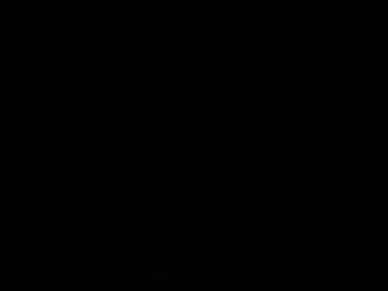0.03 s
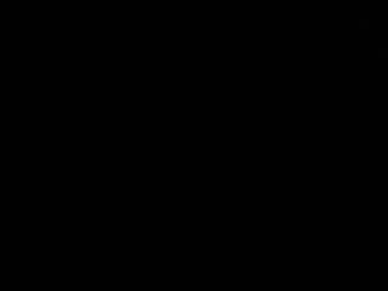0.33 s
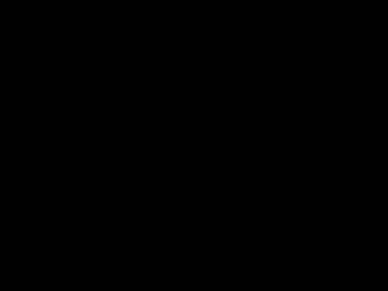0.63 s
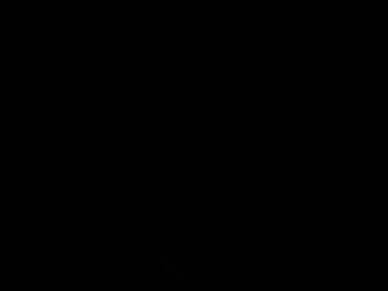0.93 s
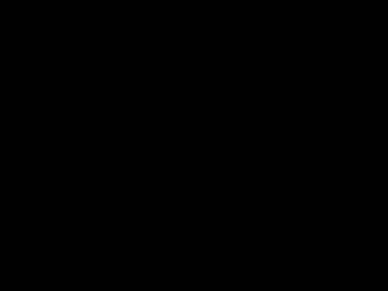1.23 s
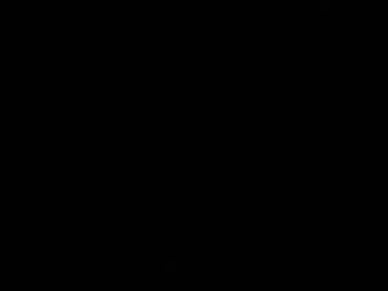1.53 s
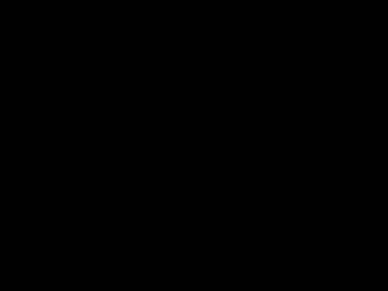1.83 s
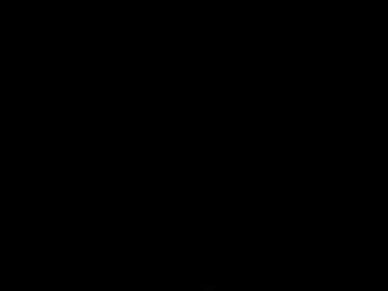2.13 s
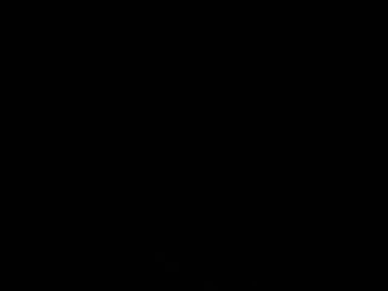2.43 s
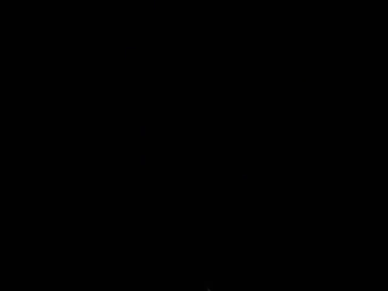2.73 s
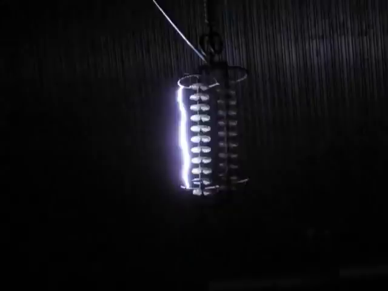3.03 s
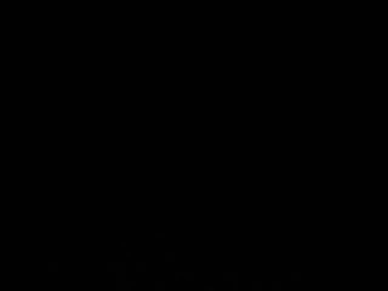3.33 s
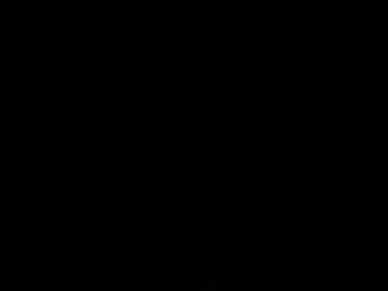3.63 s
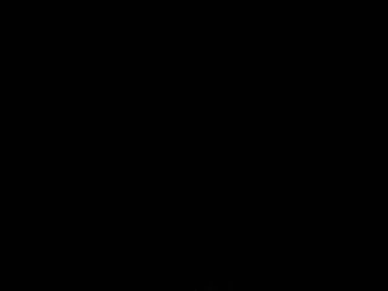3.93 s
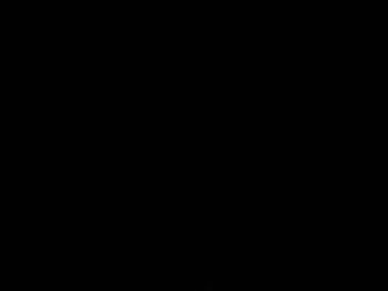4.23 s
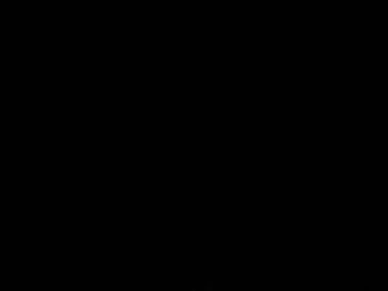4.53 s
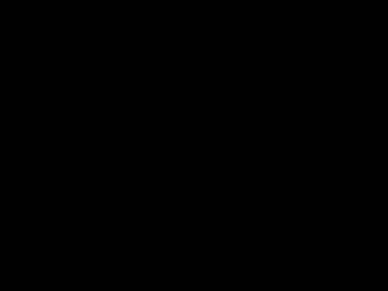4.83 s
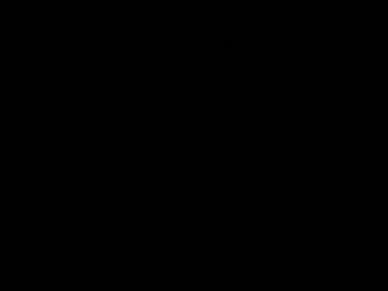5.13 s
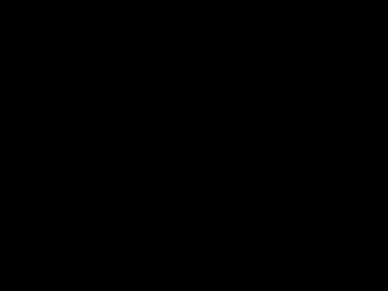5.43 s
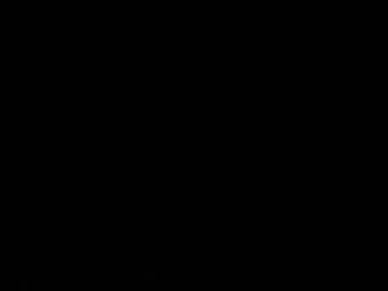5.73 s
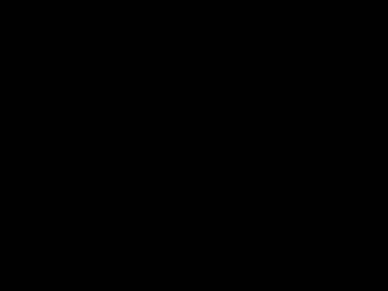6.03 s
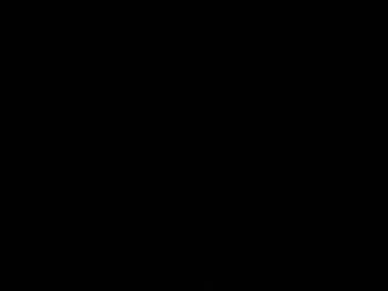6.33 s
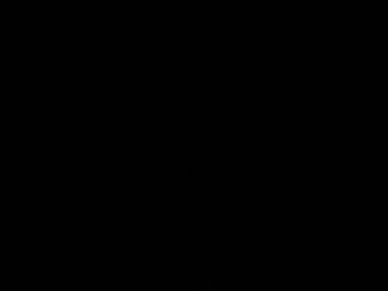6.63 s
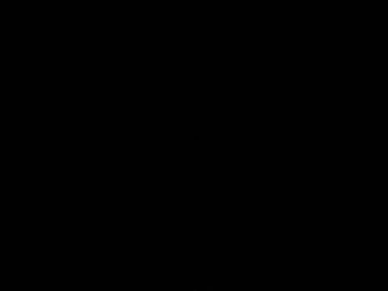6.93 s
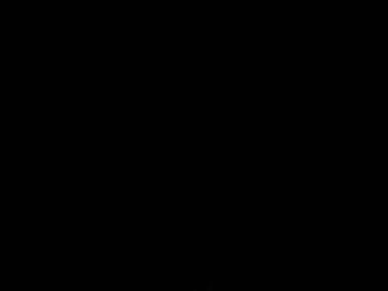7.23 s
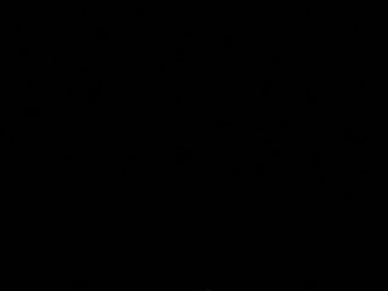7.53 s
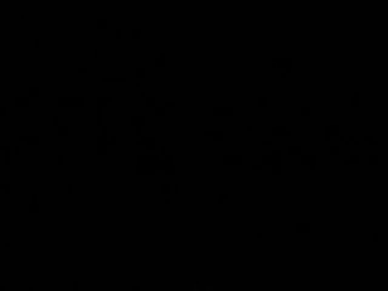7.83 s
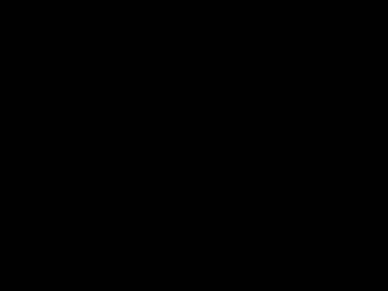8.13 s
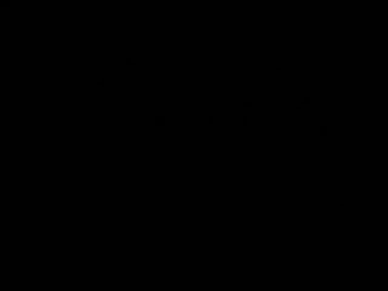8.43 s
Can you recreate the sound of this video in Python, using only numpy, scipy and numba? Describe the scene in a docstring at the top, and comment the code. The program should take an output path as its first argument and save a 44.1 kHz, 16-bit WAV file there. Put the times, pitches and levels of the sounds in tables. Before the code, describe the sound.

From the start, a high-voltage insulator gives off a bright, dense sizzle and a duller buzz over a mains hum, heard through one microphone in a large hall. Small sparks snap irregularly throughout. At about 0.7 seconds a loud, sharp arc bangs, with a brief whistling echo. The overall level ducks, then the sizzle returns and the long reverberation swells like a wave. Small snaps cluster around 1.7 to 2 seconds, with another at 2.7. Three more bangs follow quickly at 2.8, 3.0 and 3.2 seconds, each ducking the sound before the hall's echo rises and fades. The sizzle rebuilds, with snaps near 4.5, 4.8, 6.1 and 6.7 seconds and a soft, dull pop at 7.2. From about 6 seconds the discharge gradually thins into finer crackles, while the hum grows buzzier and stands out over a faint low rumble.

```python
"""Sizzle and buzz over a mains hum: streamers on an insulator at 50 Hz high voltage, on one microphone
in a large test hall. Small sparks snap and four flashovers bang, each pulling the recorder's gain down.
As the gain creeps back the sizzle returns and the flashovers' long reverberation swells like a wave.
Each flashover drains the corona for a moment; at the end the discharge dies down and the hum stands out."""
import sys
import numpy as np
from scipy import signal
from scipy.fft import rfft, irfft, next_fast_len
from scipy.io import wavfile
from numba import njit

SR = 44100
rng = np.random.default_rng(int(sys.argv[2]) if len(sys.argv) > 2 else 0)


def generate_wav(sig):
    """Save sig (samples, or channels by samples) to the path in sys.argv[1] as 16-bit PCM at SR."""
    pcm = np.round(np.clip(np.atleast_2d(sig).T, -1, 1) * 32767).astype(np.int16)
    wavfile.write(sys.argv[1], SR, pcm)


N = 379260
TIME = np.arange(N) / SR
MAINS_HZ = 49.99

# Arcs across the insulator: (time [s], overload ceiling [dB], crackle drive [dB], crackle lag [s],
# crackle ring [Hz], thump drive [dB], thump pitch [Hz], crackle length [s], wall slap gain [dB],
# whistle gain [dB], reverberation gain [dB], reverberation bass gain [dB])
ARCS = [(0.744, 9.5, -9, .0007, 3200, -.5, 340, 0.0036, 0, 10.5, -8, -1),
        (2.846, 6.5, -3.5, .0005, 4900, -3, 560, 0.0014, 2, 2.5, -12.5, 1),
        (3.0264, 7, -1, .0006, 5000, -11, 520, 0.0012, 5.5, 0, -15, -2),
        (3.2268, 11, -5.5, .0001, 4900, -12, 420, 0.0022, 7, -5, -9.5, -0.5)]


def undb(db):
    """Decibels to amplitude."""
    return 10 ** (np.asarray(db) / 20)


def unit(x):
    """Scale to rms 1."""
    return x / np.sqrt(np.mean(x ** 2))


def add(track, start_s, sound):
    """Mix a sound into the track at a time."""
    i = int(max(start_s, 0) * SR)
    track[i:i + len(sound)] += sound[:N - i]


def drift(rate_hz):
    """A slow random wander, spread near 1."""
    knots = rng.standard_normal(400)
    return 1.42 * np.interp(TIME * rate_hz, np.arange(len(knots)), knots)


def colour(x, spectrum):
    """Shape a sound by a spectrum and by the microphone's resonances; rms 1."""
    # Microphone resonances: (centre [Hz], width [Hz], boost [dB])
    resonances = [(722, 294, 5), (3064, 840, 6.5), (4210, 720, 4.5)]
    size = next_fast_len(len(x), real=True)
    f = np.arange(size // 2 + 1) * SR / size + 1
    hz, db = np.transpose(spectrum)
    gain_db = np.interp(np.log(f), np.log(hz), db)
    for centre, width, boost_db in resonances:
        gain_db += boost_db / (1 + (2 * (f - centre) / width) ** 2)
    return unit(irfft(rfft(x, size) * undb(gain_db), size)[:len(x)])


def drained(rebuild_s=1.8):
    """How far the corona is drained: 1 at each flashover, back to 0 as it builds up again."""
    ages = [TIME - start for start, *_ in ARCS]
    return np.max([(age > 0) * np.exp(-(age / rebuild_s) ** 2) for age in ages], axis=0)


def died_down(start_s=4.9, length_s=3.77):
    """How far the discharge has died down, 0 to 1: slowly at first, then faster."""
    return np.clip((TIME - start_s) / length_s, 0, 1) ** 2


def streamers(bursts, per_s, floor, scatter_db, flicker_db):
    """Tiny clicks of unequal size that crowd into bursts as the voltage nears its peaks."""
    density = np.full(N, floor)
    for centre, width, weight in bursts:
        cycle = TIME * MAINS_HZ - centre + .5
        strength = undb(flicker_db * rng.standard_normal(1024))[cycle.astype(int)]  # no two cycles alike
        density += weight * strength * np.exp(-.5 * ((cycle % 1 - .5) / width) ** 2)
    fires = rng.random(N) < per_s / SR * density / density.mean()
    signs = rng.choice([-1, 1], N)
    heights = undb(scatter_db * np.minimum(rng.exponential(size=N), 5))
    return fires * signs * heights


def corona():
    """Bright sizzle, mostly on one polarity, and a duller buzz; the hall blurs part of each into hiss."""
    # Streamer bursts in one mains cycle: (centre [cycles], width [cycles], weight)
    sizzle_bursts = [(.17, .05, .85), (.31, .06, .6), (.44, .045, 1.2), (.75, 0.12, 0.12)]
    buzz_bursts = [(.17, .06, 1.2), (.42, .04, 0.52), (.68, .09, .35)]
    # Spectra of the discharge: (frequency [Hz], relative level [dB])
    sizzle_spectrum = [(200, -25.5), (700, -20.5), (1500, -1.5), (2500, -1.5), (3600, -2), (5200, 5),
                       (6500, -2.5), (9000, -15.5)]
    buzz_spectrum = [(20, -12.5), (45, -4.5), (75, -10), (130, -3.5), (250, 0), (450, 0.5), (800, 0),
                     (1100, 0), (2000, -1), (3500, -4.5), (6500, -22), (9000, -34)]
    # Close reflections off the floor and the test rig: (delay [s], gain [dB])
    near_echoes = [(.0031, -24), (.0083, -16)]
    # Brief flare-ups of the corona: (time [s], width [s], boost [dB])
    flares = [(4.72, 0.056, 2), (5.3, 0.37, 1), (6.98, 0.15, 1.3)]
    sizzle_dip_db = -drained() - 4 * died_down()
    buzz_dip_db = -1.5 * drained() - 1.7 * died_down()
    flare_db = sum(db * np.exp(-((TIME - centre) / width) ** 2) for centre, width, db in flares)
    clicks = streamers(sizzle_bursts, per_s=6000, floor=.08, scatter_db=3.5, flicker_db=1.5)
    sizzle = clicks.copy()
    for delay, db in near_echoes:
        add(sizzle, delay, undb(db) * clicks)
    buzz = streamers(buzz_bursts, per_s=4000, floor=.12, scatter_db=2.5, flicker_db=2.0)
    blur_db = -0.4 + 1.6 * sizzle_dip_db  # a weak discharge breaks up into separate crackles
    sizzle = colour(unit(sizzle) + undb(blur_db) * rng.standard_normal(N), sizzle_spectrum)
    buzz = colour(unit(buzz) + undb(6.5) * rng.standard_normal(N), buzz_spectrum)
    return sizzle * undb(-29 + sizzle_dip_db + flare_db) + buzz * undb(-29.5 + buzz_dip_db + flare_db)


def drone_db():
    """Level of the hum's lowest note, at twice the mains; it grows as the discharge dies down."""
    return -53.5 + 11 * died_down()


def hum(waver_db=1.7):
    """Mains harmonics, wavering a little; a fine buzz of further ones comes up towards the end."""
    # Strong harmonics: (multiple of the mains, rms at full discharge [dB], rms once died down [dB])
    harmonics = [(3, -57, -57), (4, -45.5, -47), (5, -54, -49.5), (6, -44.5, -57.5), (8, -54, -53.5),
                 (9, -56.5, -59), (10, -51, -49), (11, -46, -61), (12, -48, -47.5), (14, -51.5, -46.5),
                 (16, -60.5, -47), (17, -58, -43)]
    phase = 2 * np.pi * MAINS_HZ * TIME
    late = died_down()
    levels_db = {2: drone_db(), **{k: full + (last - full) * late for k, full, last in harmonics}}
    strong, fine = np.zeros(N), np.zeros(N)
    for k, db in levels_db.items():
        amplitude = undb(db + waver_db * drift(5))
        strong += amplitude * np.sin(k * phase + .35 * drift(7.6) + rng.uniform(0, 2 * np.pi))
    for k in range(7, 27):
        if k not in levels_db:
            fine += np.sin(k * phase + .5 * drift(4.8) + rng.uniform(0, 2 * np.pi))
    return np.sqrt(2) * (strong + fine * undb(-68.5 + 17 * late))


def rumble():
    """A low, rough flutter in the hall that grows with the hum's lowest note."""
    # Spectrum of the rumble: (frequency [Hz], relative level [dB])
    spectrum = [(20, -18), (55, -12), (85, -4), (130, -5), (170, -1.5), (260, -15.5), (1000, -47.5)]
    return colour(rng.standard_normal(N), spectrum) * undb(drone_db() + 0.5)


def shock(push_s=.00008, size=64):
    """The pressure pulse of a spark, peak 1: a push, then a weaker pull."""
    half_cycles = TIME[:size] / push_s
    pulse = np.sin(np.pi * half_cycles) * np.exp(-.6 * half_cycles) * (half_cycles < 2)
    return pulse / pulse.max()


def snaps():
    """Each small spark reaches the microphone as a single shock."""
    # Small sparks: (time [s], peak at the microphone [dB])
    sparks = [(0.0184, -2.5), (0.2831, -4.5), (0.608, -5), (1.6498, -6), (1.6682, -7), (1.69, -5.5),
              (1.8172, 1.1), (2.0188, -4.5), (2.1284, -12), (2.3258, -7), (2.6985, 0), (2.8985, -2),
              (4.4595, -3.5), (4.76, -0.9), (5.6454, -15), (6.047, -6.5), (6.1297, -9), (6.14, -2.5),
              (6.668, -6), (7.23, -6), (7.528, -8.5)]
    out = np.zeros(N)
    for start, db in sparks:
        add(out, start, undb(db) * shock())
    return out


def flashovers(boom_hz=105, boom_decay_s=.009, thump_damping=2.2, size=2048):
    """A shock, the arc's thump and a short crackle overload the microphone; then the hall answers."""
    out, t = np.zeros(N), TIME[:size]
    for (start, ceiling_db, crackle_db, lag, ring_hz, thump_db, thump_hz, crackle_s,
         slap_db, whistle_db, hall_db, bass_db) in ARCS:
        cycles = t * thump_hz
        thump = np.sin(2 * np.pi * cycles) * np.exp(-thump_damping * cycles) * (cycles < 1)
        boom = np.sin(2 * np.pi * boom_hz * t) * np.exp(-t / boom_decay_s)
        crackle_gate = np.exp(-((t - lag) / crackle_s) ** 4) * (t > lag)
        bang = undb(thump_db) * (thump + undb(-27) * boom)
        bang += undb(crackle_db) * crackle(ring_hz, size) * crackle_gate
        add(bang, 0, 2 * shock())
        add(out, start, undb(ceiling_db) * np.tanh(bang))
        add(out, start, wall_echoes(slap_db, whistle_db))
        add(out, start, undb(hall_db) * hall_tail(bass_db))
    return out


def crackle(ring_hz, size, ring_width_hz=1700, ring_db=3):
    """Saturated noise, like a dense run of shocks of even height, ringing around one pitch; rms 1."""
    # Spectrum of the arc's crackle: (frequency [Hz], relative level [dB])
    spectrum = [(150, 0), (400, -10), (800, -3.5), (1300, 0), (2200, -1), (3000, 2.5), (4100, -3),
                (5200, 4.5), (6200, -1.5), (9000, -17.5)]
    noise = colour(rng.standard_normal(size), spectrum)
    ring = signal.lfilter(*signal.iirpeak(ring_hz, ring_hz / ring_width_hz, fs=SR), noise)
    return unit(np.tanh(unit(noise + undb(ring_db) * ring)))


def hall_tail(bass_db, bass_edge_hz=1000, size=131072):
    """Reverberation: the middle builds as the far walls answer; the treble comes at once and dies first."""
    # Spectrum of a bang in the hall: (frequency [Hz], relative level [dB])
    bang_spectrum = [(30, -21), (90, -24.5), (180, -7.5), (320, 0), (500, -1), (800, 0), (1100, -1),
                     (1800, 3.5), (2300, 2), (2900, 1), (3600, 1), (4500, 2.5), (6500, 1.5), (9000, -11)]
    # Reverberation by band: (frequency [Hz], t60 [s], build-up time [s], share that builds up [0-1])
    hall_bands = [(100, 2.9, .02, .5), (400, 4.5, .03, 0.5), (895, 4.5, 0.09, 0.42),
                  (2100, 3.63, 0.2, 0.52), (2880, 3.45, 0.059, 0.57), (4000, 1.96, 0.14, 0.3),
                  (6000, 1.18, .006, 0)]
    f = np.arange(size // 2 + 1) * SR / size + 1
    bass_shelf = undb(bass_db / (1 + (f / bass_edge_hz) ** 4))
    spectrum = rfft(colour(rng.standard_normal(size), bang_spectrum)) * bass_shelf
    log_centres = np.log([hz for hz, *_ in hall_bands])
    tail, t = np.zeros(size), TIME[:size]
    for (_, t60, rise_s, late_share), selector in zip(hall_bands, np.eye(len(hall_bands))):
        band = irfft(spectrum * np.interp(np.log(f), log_centres, selector))
        build_up = 1 - late_share * np.exp(-t / rise_s)
        tail += band * build_up * undb(-60 * t / t60)
    return tail


def wall_echoes(slap_db, whistle_db, slap_decay_s=.003, smear=.06, size=16384):
    """A bang comes back from the walls as bright slaps, and from their ribs as falling whistles."""
    # Distinct wall echoes: (delay [s], relative level [dB], ring [Hz])
    slaps = [(0.049, -13, 3570), (0.0723, -9, 5000), (.0975, -13, 3300)]
    # Echoes off ribbed walls: (delay [s], start [Hz], end [Hz], length [s], relative level [dB])
    whistles = [(.075, 3900, 2350, .021, -19), (.114, 2900, 2400, .012, -23), (.158, 3700, 2650, .016, -23),
                (.16, 4700, 3750, .013, -26)]
    out, t = np.zeros(N), TIME[:size]
    for delay, db, ring_hz in slaps:
        add(out, delay, undb(slap_db + db) * crackle(ring_hz, size) * np.exp(-t / slap_decay_s))
    for delay, start_hz, end_hz, length, db in whistles:
        progress = np.minimum(t / length, 1)
        hz = end_hz + (start_hz - end_hz) * (1 - progress) ** 2  # farther ribs answer at wider steps
        hz *= 1 + smear * rng.standard_normal(size)  # uneven ribs smear the tone
        tone = np.sin(2 * np.pi * np.cumsum(hz) / SR)
        add(out, delay, undb(whistle_db + db) * np.sin(np.pi * progress) * tone)
    return out[:size]


def pops():
    """A soft, dull double pop under the dying sizzle."""
    # Short tone pulses: (time [s], envelope peak [dB], pitch [Hz], length [s])
    pulses = [(7.199, -29, 342, 0.01), (7.202, -24, 656, 0.0063)]
    out = np.zeros(N)
    for start, db, hz, length in pulses:
        t = TIME[TIME < length]
        envelope = undb(db) * np.sin(np.pi * t / length) ** 2
        add(out, start, envelope * np.sin(2 * np.pi * hz * t))
    return out


def scene():
    """The insulator and the hall at one microphone, ahead of the recorder's gain."""
    return (corona() + hum() + rumble() + snaps() + pops() + flashovers())[None]


@njit
def hold_peaks(x, fall):
    """The recorder's level detector: follows each peak at once and lets go slowly."""
    held, level = np.empty(len(x)), 0.
    for i in range(len(x)):
        level = max(abs(x[i]), level * fall)
        held[i] = level
    return held


def record(dry, ceiling_db=-9, recovery_db_per_s=30, top_hz=5950):
    """The recorder's gain drops at peaks over the ceiling and creeps back; a low-pass takes off the top."""
    held = hold_peaks(dry[0], float(undb(-recovery_db_per_s / SR)))
    gain = 1 / np.maximum(held / undb(ceiling_db), 1)
    low_pass = signal.firwin(65, top_hz, window=("kaiser", 7), fs=SR)
    return np.convolve(gain * dry[0], low_pass, "same")[None]


dry = scene()
out = record(dry)
generate_wav(out)
```